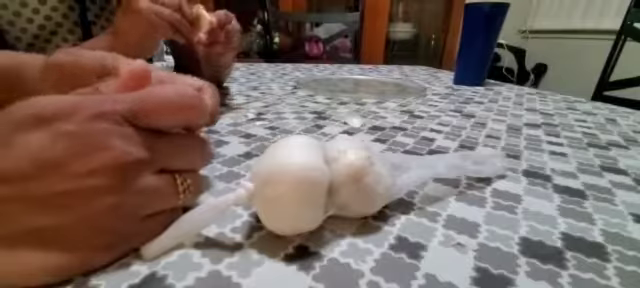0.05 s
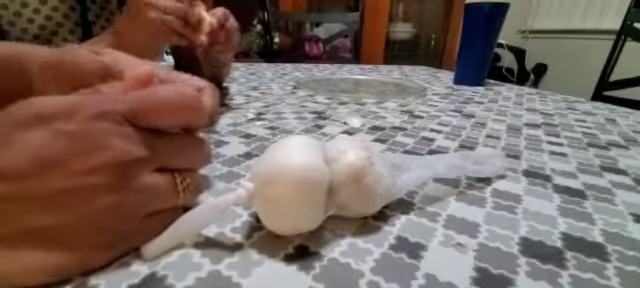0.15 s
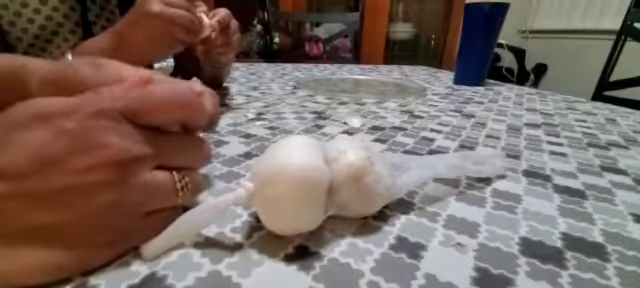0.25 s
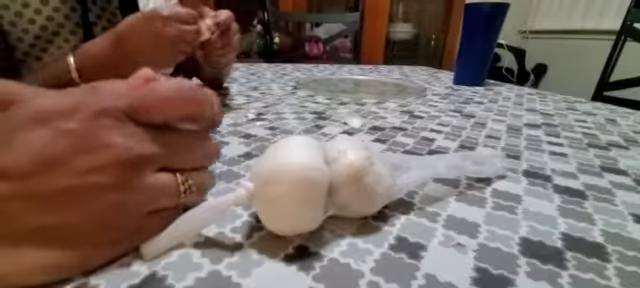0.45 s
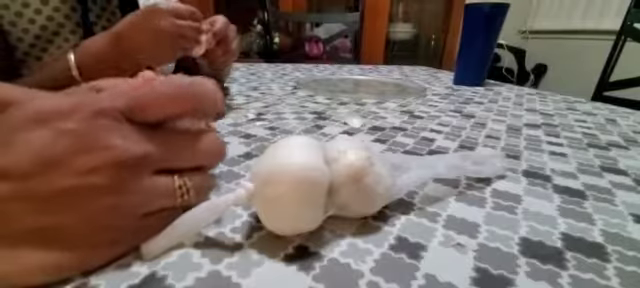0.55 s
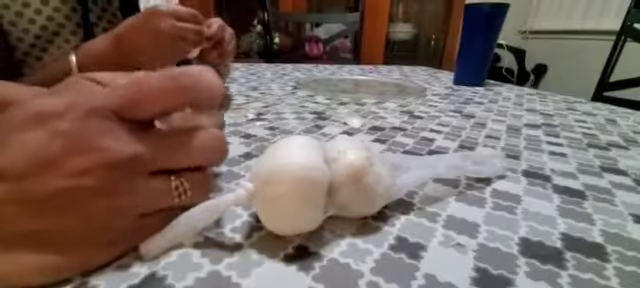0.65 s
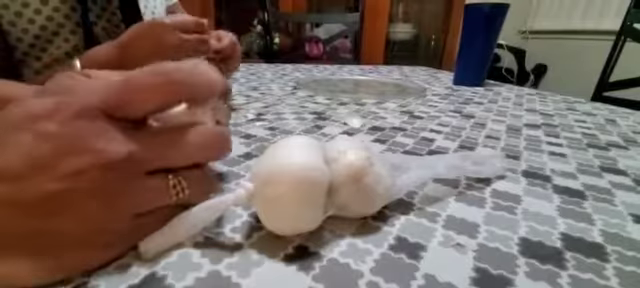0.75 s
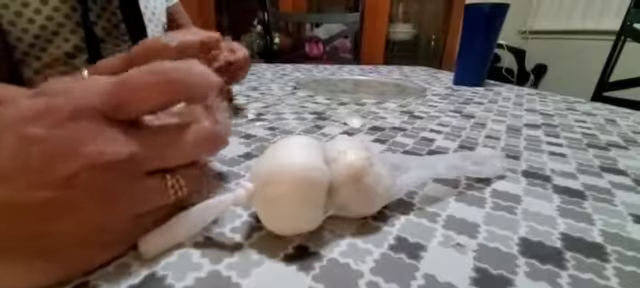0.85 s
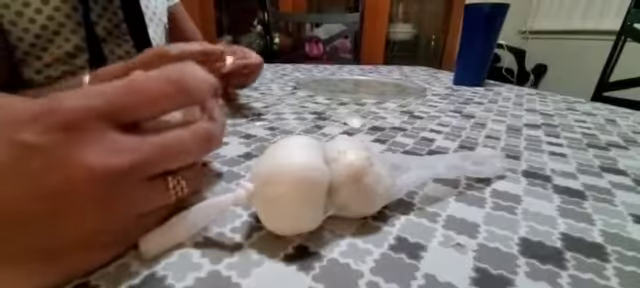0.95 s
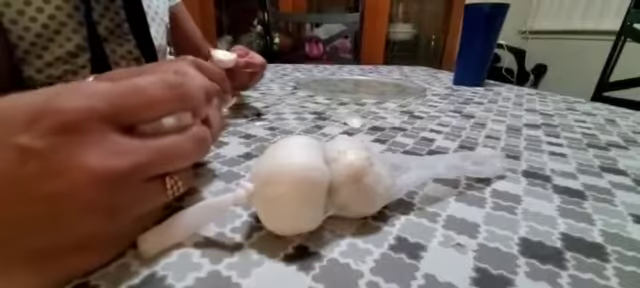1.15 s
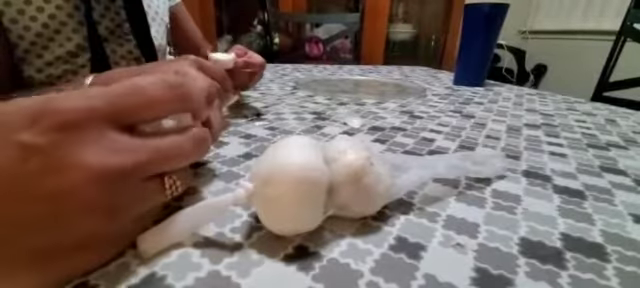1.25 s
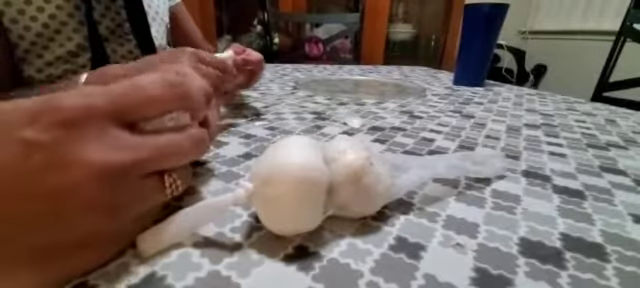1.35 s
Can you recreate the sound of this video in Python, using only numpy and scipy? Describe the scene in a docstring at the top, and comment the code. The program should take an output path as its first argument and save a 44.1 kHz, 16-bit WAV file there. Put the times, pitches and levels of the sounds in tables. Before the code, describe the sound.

Fingers rub and break papery garlic skin, first faintly, then with a loud brittle rip and a soft table bump, followed by sparse crisp ticks and rustles; close stereo pickup, small room, low steady noise.

```python
"""In a small room, fingers peel dry garlic at a table, close to a microphone with two ports.
The papery skin crackles as it is rubbed, snaps in clusters of tiny fractures and once tears off in a strip:
all three are random clicks sent through the resonances of the skin.
A hand slides on the tablecloth (filtered noise) and bumps it (short, low sine tones).
The left port hears the crisp edge, the right one the ring near 5 kHz."""
import sys
import numpy as np
from scipy import signal
from scipy.fft import rfft, irfft, next_fast_len
from scipy.io import wavfile

SR = 44100
rng = np.random.default_rng(int(sys.argv[2]) if len(sys.argv) > 2 else 0)


def pcm_store(signal):
    """Save signal as 16-bit PCM."""
    levels = np.round(np.clip(np.atleast_2d(signal), -1, 1) * 32767)
    wavfile.write(sys.argv[1], SR, levels.astype(np.int16).T)


N = 61739  # length in samples, 1.4 s
TIME_S = np.arange(N) / SR
RIGHT_DELAY_S = 0.00035  # the sound reaches the right port this much later


def from_db(db):
    """Turn decibels into a gain."""
    return 10 ** (np.asarray(db) / 20)


def rms_one(x):
    """Scale a sound to an rms (average strength) of 1."""
    return x / np.sqrt(np.mean(x ** 2) + 1e-20)


def in_time(rows):
    """Draw straight lines between the rows of a table, giving each column a value at every sample."""
    times_s, *columns = np.transpose(rows)
    return [np.interp(TIME_S, times_s, column) for column in columns]


def band(x, edges_hz, order=2):
    """Keep only the pitches between two edges, as a resonance does, and scale to rms 1."""
    edges = np.sort(np.clip(edges_hz, 10, 0.45 * SR))
    sos = signal.butter(order, edges, "band", fs=SR, output="sos")
    return rms_one(signal.sosfilt(sos, x + 1e-18))


def colour(x, points):
    """Change the tone to follow (pitch_hz, level_db) points, with as little delay as possible (minimum phase)."""
    size = next_fast_len(2 * N)
    hz, db = np.transpose(points)
    log_hz = np.log(np.fft.rfftfreq(size, 1 / SR) + 1)
    log_gain = np.log(from_db(np.interp(log_hz, np.log(hz), db)))
    # folding the cepstrum onto positive times makes the filter act only after its input
    cepstrum = irfft(log_gain, size)
    cepstrum[1:size // 2] *= 2
    cepstrum[size // 2 + 1:] = 0
    return irfft(rfft(x, size) * np.exp(rfft(cepstrum)), size)[:N]


def fractures(per_s, spread_db, size):
    """Tiny cracks click at random moments with uneven strength, and radiate unevenly to the two ports."""
    port_scatter = 0.51
    strength = from_db(spread_db * np.minimum(rng.exponential(1, size), 5))
    happens = rng.random(size) < per_s / SR
    clicks = strength * rng.choice([-1, 1], size) * happens
    return clicks * (1 + port_scatter * rng.standard_normal((2, size)))


def skin(clicks, knock_hz, knock_db, crack_db, edge_db):
    """Clicks sound through the dry skin: a ring, a low knock with two resonances, a crack and a crisp edge."""
    # each pair is the low and high limit of a resonance, in Hz
    ring = band(clicks, (4664, 5732)) + from_db(-5.5) * band(clicks, (5230, 7220))
    knock = band(clicks, knock_hz, order=3) + from_db(0.5) * band(clicks, (2426, 3435), order=3)
    crack = band(clicks, (3330, 4990), order=3)
    edge = band(clicks, (6980, 16500), order=3)
    return ring + from_db(knock_db) * knock - from_db(crack_db) * crack - from_db(edge_db) * edge


def room_floor():
    """The quiet room is a steady bed of noise with its own tone."""
    # tone of the quiet room: pitch_hz [Hz], level_db [relative dB per Hz]
    floor_tone = [(25, -1.5), (70, 2.5), (150, 3), (250, -1), (600, -5.5), (1400, -18.5), (2100, -15),
                  (5000, 3.5), (9000, -3), (15500, -7.5)]
    floor_db = -54  # before the colour of the port
    return from_db(floor_db) * rms_one(colour(rng.standard_normal(N), floor_tone))


def rustle():
    """Skin rubbed between the fingers catches and slips, so its fine crackle comes in small clumps."""
    # strength of the rubbing: time_s [s], level_db [dB], edge_db [dB relative to the level]
    rub_curve = [(0, -38.5, 3), (.055, -68.5, 10.5), (.11, -48, -2.5), (.175, -69, -32), (.22, -44.5, -5),
                 (.3, -63, -17), (.41, -45.5, -27), (.465, -48, 10), (.5, -43, 11.5), (.53, -54.5, 12),
                 (.58, -47, -2), (.64, -49, 4.5), (.705, -42, 2.5), (.78, -61, 4.5), (.825, -51, 4.5),
                 (.9, -44.5, 3.5), (.96, -48.5, 7.5), (1.02, -42, 3), (1.07, -38, 1), (1.095, -41, 0),
                 (1.125, -43, 9), (1.165, -87, 0), (1.26, -65, -1), (1.335, -48, -4), (1.37, -80, 12),
                 (1.4, -49, 5)]
    clicks_per_s, spread_db = 5000, 1
    clumps_per_s, clump_db = 240, 3.3
    hollow_hz, knock_db, crack_db = (1190, 1940), -17.5, -1.5
    level_db, edge_db = in_time(rub_curve)
    random_steps = np.clip(rng.standard_normal(N), -2, 2)
    clumps = np.interp(TIME_S * clumps_per_s, np.arange(N), random_steps)
    clicks = fractures(clicks_per_s, spread_db, N) * from_db(clump_db * clumps)
    return from_db(level_db) * skin(clicks, hollow_hz, knock_db, crack_db, edge_db)


def hand_slide():
    """A hand sliding on the tablecloth makes noise, which sounds hollow through several resonances."""
    # strength of the slide: time_s [s], level_db [dB]
    slide_curve = [(.49, -66.5), (.56, -46.5), (.6, -45), (.63, -45), (.71, -51.5), (.77, -57), (.86, -60),
                   (1.1, -62), (1.2, -94)]
    # resonances of the slide: pitch_hz [Hz], width_hz [Hz], level_db [relative dB]
    slide_resonances = [(173, 85, -2.5), (359, 60, -2.5), (560, 230, 0), (778, 59, 1.5), (1354, 61, 8.5),
                        (1680, 190, -2), (2790, 260, 5)]
    noise = np.zeros(N)
    for hz, width, db in slide_resonances:
        edges_hz = (hz - width / 2, hz + width / 2)
        noise += from_db(db) * band(rng.standard_normal(N), edges_hz, order=1)
    return from_db(in_time(slide_curve)[0]) * rms_one(noise)


def snaps():
    """The skin snaps in short swells of fractures, a few milliseconds long, with a little crackle after each."""
    # snaps of the skin: peak_s [s, heard twice RIGHT_DELAY_S earlier], length_ms [ms, width at 61 % height],
    # level_db [dB, rms of the ring over 2 ms], knock_db, crack_db, edge_db [dB relative to the level]
    snap_rows = [(0.0141, 0.44, -45.5, -14, 5, 13.5), (0.0284, 2.1, -46.5, -10, -23, 12.5),
                 (0.1135, 1.5, -39.5, -38, -19, -24), (0.15, 3.3, -40, -38, -36, 5),
                 (0.1588, 3.2, -37, -48, -6.5, -21), (.1898, 1.6, -36.5, -27, -10, -8),
                 (0.2313, 2.43, -12, -15.5, -7.5, 1), (0.2396, 1.3, -28.5, -19, -26, -16),
                 (0.2439, 0.89, -26.5, -10.5, -38, -3), (0.2686, 1.2, -30, -15.5, -24, -17),
                 (0.3103, 3.3, -26, -13.5, 3, 15), (0.3186, 2, -25.5, -16.5, -25, -8),
                 (0.3237, 4.7, -4.5, -25, -12, -3.5), (0.3305, 1.3, -10.5, -32, -5, 5.5),
                 (0.3414, 0.89, -14, -23, -12, -2), (.4132, 1.8, -38.5, -13, 13.5, -20),
                 (0.433, 0.99, -44, -28, 12, -17), (0.449, 1.7, -42, -20, -27, 2),
                 (.4706, 0.71, -35.5, -47, 4, 6), (.4788, 0.68, -49, -30, -18, -16),
                 (0.4814, 0.99, -30, -45, -11, 16.5), (.4866, 3.9, -26.5, -26, -27, 13),
                 (0.5398, 1.3, -20.5, -23.5, 1, -2.5), (0.5463, 2.1, -18, -44, 3.5, -46),
                 (0.5546, 4, -28, -49, -3, -35), (.559, 4.8, -46, -11, -13, -13),
                 (0.59, 0.88, -34.5, -27, 0, 0), (0.5962, 1, -26, -17.5, -1, -11),
                 (.598, 4.3, -31.5, -26, -17, 7), (0.6611, 1.2, -46.5, -22, -6, 15.5),
                 (0.6713, 0.99, -34.5, -19, -24, -1), (.6847, 0.67, -33, -20, -29, -26),
                 (0.8136, 7.3, -31.5, -29, -27, -7.5), (0.8771, 1.7, -39, -19, 5.5, -9),
                 (0.9127, 2.3, -34, -40, -4, 6), (0.931, 1.1, -51, -34, 8, 17),
                 (0.9371, 3.6, -33.5, -20, -29, 3.5), (1.1024, 3.3, -19.5, -43, -15, -11),
                 (1.1058, 2.9, -24, -28.5, -2.5, -0.5), (1.1182, 0.91, -28.5, -18, -5.5, 9),
                 (1.127, 4.4, -33, -9.5, -27, 4), (1.1839, 1.1, -46, -21, -20, 8),
                 (1.1864, 1.6, -51, -31, -38, 15.5), (1.22, 0.94, -52, -38, -25, 13),
                 (1.237, 2.7, -21, -20.5, -8, -2.5), (1.246, 0.83, -39.5, -24, -31, -57),
                 (1.2807, 0.69, -31, -55, -32, -15), (1.2956, 1.3, -33.5, -31, -32, -32),
                 (1.3008, 1.3, -28, -35, -26, -11.5), (1.311, 1.8, -35.5, -24, -21, -13),
                 (1.3217, 1.5, -38, -36, -21, -15), (1.3328, 2.6, -27, -35, -17, -10)]
    clicks_per_s, spread_db = 22000, 2.5
    knock_hz, after_crackle = (389, 1440), 0.06  # the crackle is a share of the swell's height
    half = SR // 50  # samples on each side of the peak, 20 ms
    ms = np.arange(-half, half) / SR * 1000
    out = np.zeros((2, N + 4 * half))
    for peak_s, length_ms, db, knock_db, crack_db, edge_db in snap_rows:
        swell = np.exp(-2 * (ms / length_ms) ** 2)
        swell += after_crackle * (ms > 0) * np.exp(-np.abs(ms) / (2 * length_ms))
        clicks = fractures(clicks_per_s, spread_db, 2 * half) * swell
        snap = skin(clicks, knock_hz, knock_db, crack_db, edge_db)
        start = int(max(peak_s - RIGHT_DELAY_S * 2, 0) * SR)
        # the square root of 20 turns an rms over 40 ms into one over 2 ms
        out[:, start:start + 2 * half] += from_db(db) / np.sqrt(20) * snap
    return out[:, half:half + N]


def hand_bumps():
    """Soft bumps on the table are low tones that swell quickly and die away."""
    # bumps: start_s [s], pitch_hz [Hz], level_db [dB, height of the swell], rise_s [s]
    bump_rows = [(.322, 75.8, -35.5, 0.012), (.321, 230, -55, 0.0063), (.345, 149.4, -47, .016),
                 (0.361, 37.2, -40.5, 0.023), (.385, 72.6, -45, 0.0176), (.595, 91.8, -45.5, 0.0029)]
    out = np.zeros(N)
    for start_s, hz, db, rise_s in bump_rows:
        t = np.maximum(TIME_S - start_s, 0)
        swell = t / rise_s * np.exp(1 - t / rise_s)
        out += from_db(db) * swell * np.sin(2 * np.pi * hz * t)
    return out


def tear():
    """A strip lets go: dense fractures start almost at once and die away."""
    peak_s, attack_s, level_db, fall_db_per_s = 0.3231, 0.0015, -17.5, 317
    clicks_per_s, spread_db = 23000, 2
    knock_hz, knock_db, crack_db, edge_db = (1125, 1890), -12, 0, 0.5  # the knock is the hollow part
    t = TIME_S - peak_s
    attack = np.clip(1 + t / attack_s, 0, 1)
    envelope = attack * from_db(level_db - fall_db_per_s * np.maximum(t, 0))
    clicks = fractures(clicks_per_s, spread_db, N)
    return envelope * skin(clicks, knock_hz, knock_db, crack_db, edge_db)


def reflections(x, db, t60_s, delay_s):
    """Echoes form a noisy wash that starts after a delay and fades by 60 dB in t60_s."""
    t = np.arange(SR // 2) / SR
    response = rng.standard_normal(len(t)) * from_db(-60 * t / t60_s) * (t > delay_s)
    return from_db(db) * signal.fftconvolve(x, response / np.linalg.norm(response))[:N]


def scene():
    """The sound reaches the left port first; each port has its own colour, echoes and noise floor."""
    # colour of each port: pitch_hz [Hz], level_db [dB]
    left_colour = [(150, -7), (600, -12), (1400, -2), (3500, -9), (5200, -16), (6500, -8), (8300, -6),
                   (9500, -7.5), (12000, -4.5), (15500, 1)]
    right_colour = [(150, -8), (600, -12.4), (1400, 2.66), (3500, -5), (5200, -3.35), (6500, 0.6),
                    (8000, -15.5), (9000, -12.5), (11000, -16), (13000, -20.5), (15500, -14)]
    left, right = rustle() + hand_slide() + snaps() + hand_bumps() + tear()
    right = np.pad(right, (int(RIGHT_DELAY_S * SR), 0))[:N]
    ports = []
    for port_colour, direct in ((left_colour, left), (right_colour, right)):
        early = reflections(direct, db=-11, t60_s=0.057, delay_s=0.0065)  # from table and hands
        tail = reflections(direct, db=-13, t60_s=0.28, delay_s=0.0084)  # from the room
        ports.append(colour(direct + early + tail + room_floor(), port_colour))
    return np.array(ports)


def record(dry):
    """Loud peaks are rounded off and the highest pitches are cut."""
    rounded = 0.9 * np.tanh(dry / 0.9)
    cutoff_hz = 15850
    low_pass = signal.firwin(255, cutoff_hz, window="blackman", fs=SR)
    return signal.fftconvolve(rounded, low_pass[None], "same")


dry = scene()
out = record(dry)
pcm_store(out)
```